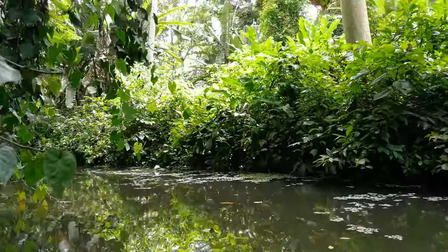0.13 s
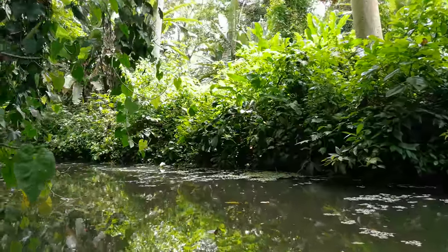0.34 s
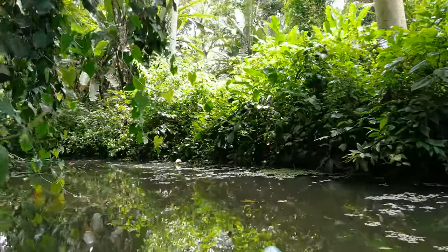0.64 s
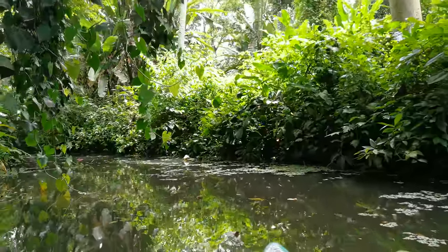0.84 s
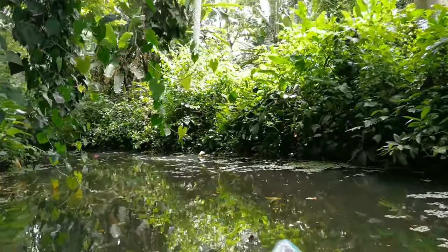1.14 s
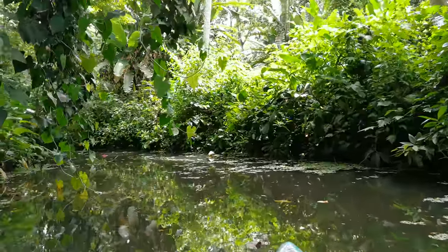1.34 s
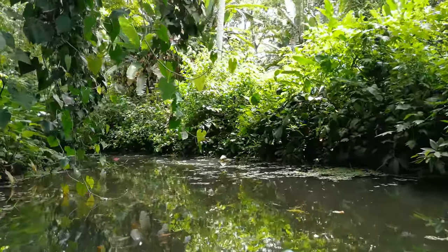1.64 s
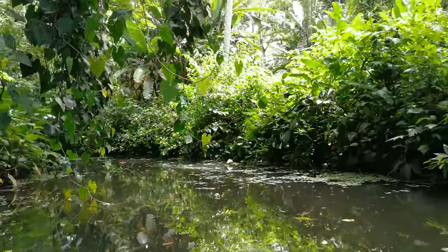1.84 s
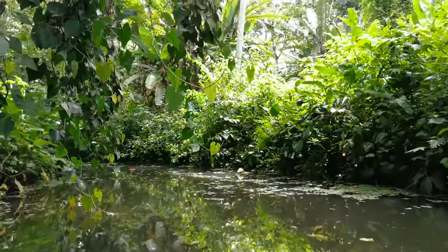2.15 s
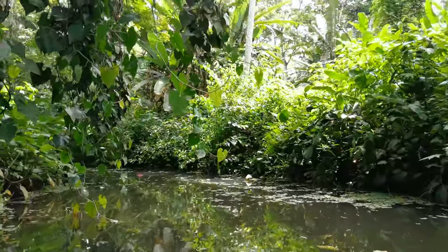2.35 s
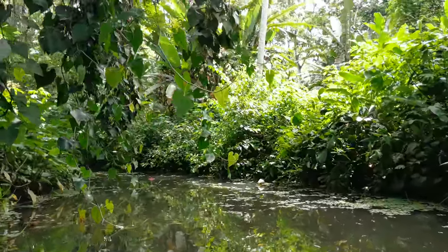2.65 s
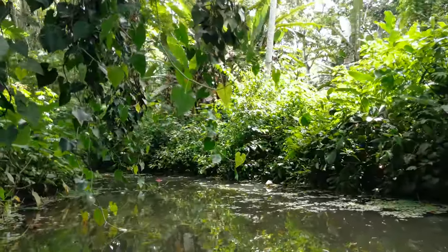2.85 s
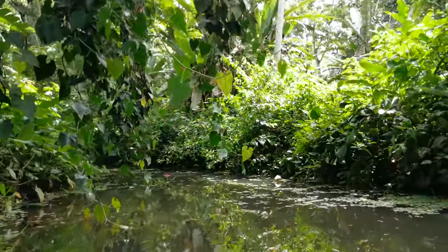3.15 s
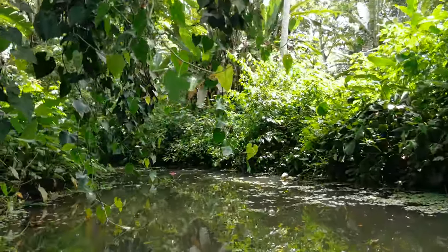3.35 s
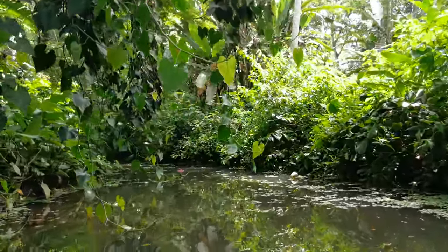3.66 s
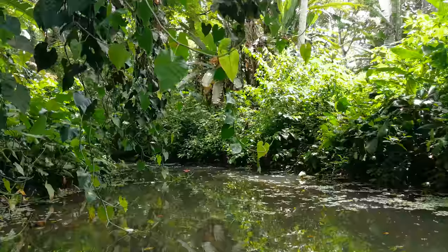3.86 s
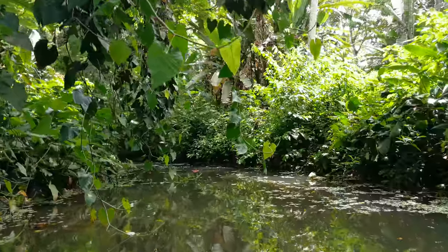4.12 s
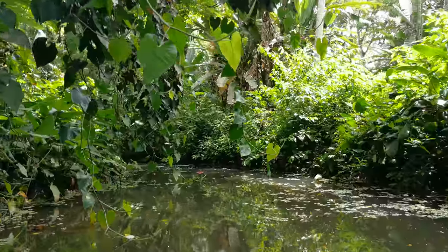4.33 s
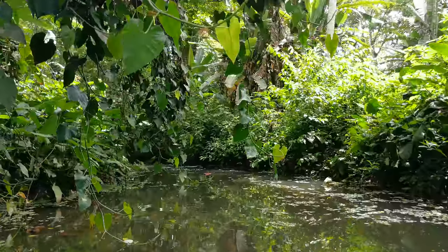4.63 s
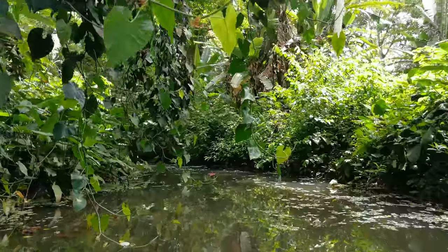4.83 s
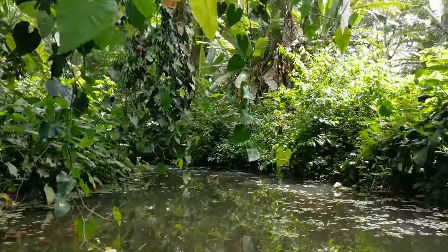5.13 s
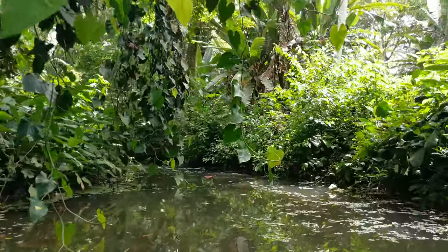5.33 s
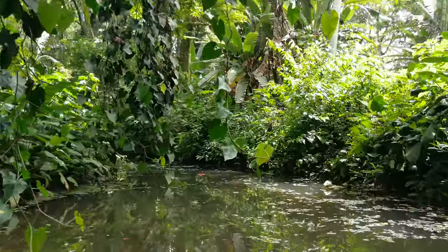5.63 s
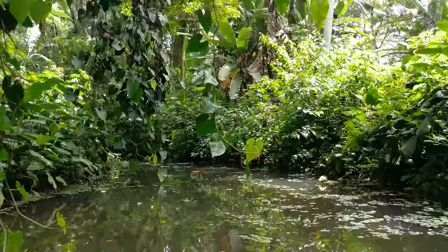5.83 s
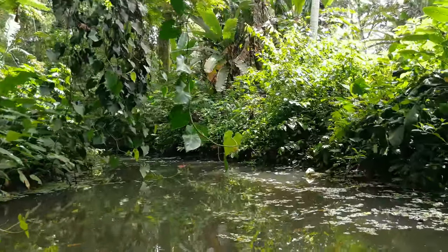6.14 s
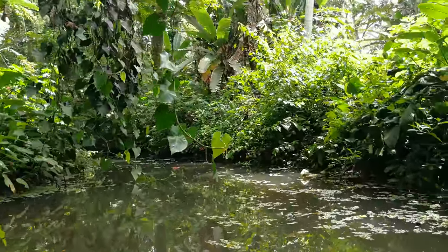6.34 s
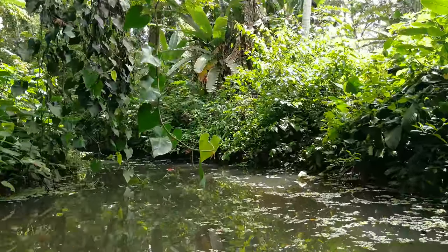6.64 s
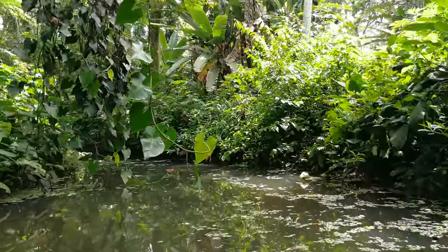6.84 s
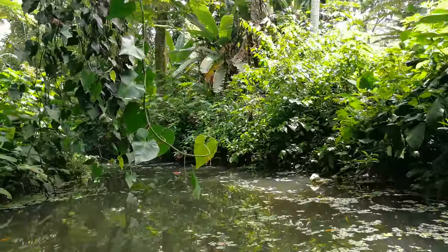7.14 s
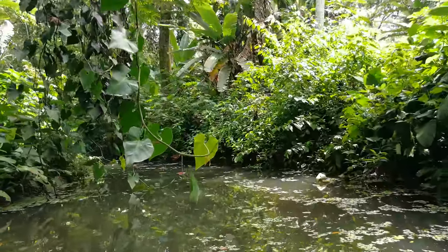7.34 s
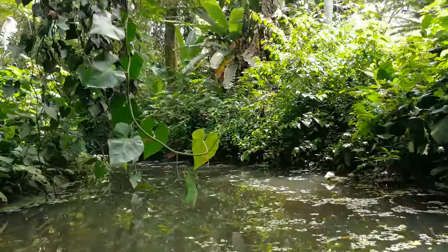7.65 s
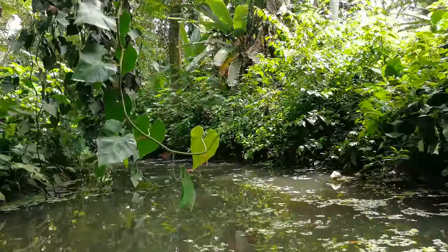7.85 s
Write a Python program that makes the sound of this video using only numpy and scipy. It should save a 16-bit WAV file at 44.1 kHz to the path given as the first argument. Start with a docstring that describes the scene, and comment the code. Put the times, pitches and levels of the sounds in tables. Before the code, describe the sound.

Cicadas shrill steadily from both jungle banks, far louder than the gentle lapping and occasional dull knocks of a drifting wooden boat.

```python
"""Cicadas shrill from both banks of a jungle waterway: a loud high choir over quieter, lower ones,
each insect buckling its ribs so fast, and so many at once, that the clicks fuse into a hiss.
Far softer, water laps and swishes along a drifting wooden boat, with knocks, taps and short scuffs.
A few faint blips pass; underneath lie a low rumble, a wavering hum and the hush of the forest."""
import sys
import numpy as np
from scipy import signal
from scipy.fft import rfft, irfft, next_fast_len
from scipy.io import wavfile
from scipy.ndimage import uniform_filter1d, map_coordinates

SR = 44100
rng = np.random.default_rng(int(sys.argv[2]) if len(sys.argv) > 2 else 0)


def dump_mix(stems):
    """Bounce the given channels to the path in sys.argv[1] as a 16-bit WAV at rate SR."""
    frames = np.atleast_2d(stems).T  # one column per channel
    limited = np.clip(frames, -1, 1)  # hard clip at full scale
    pcm = np.round(limited * 32767).astype(np.int16)
    wavfile.write(sys.argv[1], SR, pcm)


N = 351918

# The high choir swells a little and eases toward the middle: t/s, level/dB, pan/dB (left minus right)
HIGH_CHOIR_RIDE = [(0, -19.5, 2.5), (3.5, -19.5, 2), (7.98, -18.5, 1)]
# Fader ride of the low choir: t/s, level/dB
LOW_CHOIR_RIDE = [(0, -40.5), (0.3, -38), (0.75, -39.5), (1.42, -40.5), (1.75, -37.5), (2.1, -39.5),
                  (2.75, -37), (3.05, -38.5), (4.65, -39.5), (5.6, -38.5), (6.0, -38.5), (6.4, -37.5),
                  (7.98, -38)]
# A few deeper singers strike up and trail off: peak t/s, level/dB, fade/s
FAR_SWELLS = [(3.63, -60, .12), (4.05, -57, 0.16), (4.4, -60, 0.28), (5.13, -59, 0.25), (5.34, -65, 0.079),
              (5.7, -65, .08), (6.02, -59, 0.17), (6.5, -65, 0.24)]
# Air sac resonance of the high singers: f/Hz, gain/dB
HIGH_SAC_EQ = [(3650, -54), (6200, -19.5), (6900, -14.5), (7650, -6), (8400, -2.5), (9000, 0.5),
               (9500, 2.5), (10000, 0), (10300, -1), (10600, -5.5), (11300, -9.5), (12300, -21.5),
               (13100, -28.5), (14200, -47), (15800, -45.5)]
# Air sac resonance of the low singers: f/Hz, gain/dB
LOW_SAC_EQ = [(1940, -83), (3300, -24.5), (3900, -4.5), (4400, 2), (4650, 2.5), (4790, 4.5), (4950, 3),
              (5720, 1), (6800, -1), (8840, -55), (15000, -120)]
# Air sac resonance of the far singers: f/Hz, gain/dB
FAR_SAC_EQ = [(2400, -50), (2800, -9), (3050, 1), (3300, 2), (3650, 5.5), (4100, -2.5), (5000, -120)]
# Stereo tilt that makes the choirs brighter on the left: f/Hz, left minus right/dB
CHOIR_TILT = [(2500, -4.5), (4400, -7), (8100, -4), (15000, 1.5)]
# Wavelets meeting the hull: peak t/s, hiss level/dB, slosh level/dB, fade/s
HULL_WAVELETS = [(0.55, -74, -72, 0.1), (0.85, -75, -81, 0.22), (1.5, -71.5, -76, 0.37),
                 (2.4, -70.5, -84, 0.19), (3.46, -69.5, -76.5, 0.17), (4.65, -66.5, -81, 0.21),
                 (5.05, -76, -74, 0.12), (5.4, -81, -86, 0.18), (6.02, -78, -78, 0.17),
                 (6.55, -75, -86, 0.32), (7.2, -72, -75.5, 0.12), (7.85, -69.5, -74, 0.38)]
# Hiss of water along the hull: f/Hz, gain/dB
LAP_EQ = [(450, -120), (600, -2), (750, -3), (1150, 1), (1800, -0.5), (2300, -2), (2900, -0.5),
          (4000, -120)]
# Water under the boards: f/Hz, gain/dB
SLOSH_EQ = [(150, -120), (210, 0), (270, -1.5), (400, -3.5), (520, -4.5), (700, -31), (1200, -120)]
# Soft blows on the hull: t/s, level/dB, rise/s, struck plank's f/Hz
HULL_KNOCKS = [(1.211, -55.5, .01, 108), (1.262, -56, .01, 170), (1.513, -57.5, .006, 170),
               (1.577, -57, .006, 150), (1.62, -58, 0.0069, 200), (4.959, -58, 0.0093, 250),
               (5.644, -45.5, 0.0032, 292), (5.648, -56, .003, 470), (5.652, -40.5, 0.0048, 127),
               (5.675, -54, 0.0038, 285), (5.701, -50, 0.006, 125), (5.89, -39, 0.0084, 121),
               (5.915, -42.5, 0.0073, 121), (5.898, -53, .003, 630), (5.973, -43.5, 0.005, 190),
               (6.021, -55, 0.011, 105)]
# Ringing modes of the hull: f/Hz, gain/dB, t60/s
HULL_MODES = [(84.4, -15, .3), (108.3, -1.5, 0.32), (125.6, 8, 0.14), (161, 2.5, 0.18), (186.5, 3.5, 0.16),
              (225, 3, 0.17), (283, 3.5, 0.26), (332, -6, 0.11), (465, 4, 0.09), (622, 5.5, 0.1),
              (770, -1, .08), (960, -16, .06)]
# Light taps: t/s, level/dB, slat gain/dB, pan/dB
TAPS = [(0.679, -47, -4, 2), (0.828, -51, -7, 1), (0.955, -49.5, -4, -3), (1.295, -46, -7, 0.5),
        (5.24, -57, -17, -0.5)]
# The short click of a tap: f/Hz, gain/dB, t60/s
CLICK_MODES = [(830, -7.5, .025), (1060, -4, .035), (1250, -7, .025), (1420, -3.5, .03)]
# The ring of a thin slat: f/Hz, gain/dB, t60/s
SLAT_MODES = [(270, -8, 0.12), (422, -8, 0.2), (1106, -13, 0.14)]
# Short scuffs and longer swishes of water: t/s, level/dB, centre f/Hz, width/Hz, length/s, pan/dB
SCUFFS_AND_SWISHES = [(1.401, -61.5, 1450, 550, 0.13, -2), (1.732, -62, 1710, 600, 0.065, 0),
                      (2.28, -66, 1950, 400, 0.05, -2), (3.05, -56, 850, 450, 0.04, -2),
                      (3.066, -52, 1260, 800, 0.063, -4), (3.1, -59.5, 1200, 700, 0.13, -2),
                      (3.13, -56, 1150, 400, 0.014, -3), (3.143, -59, 1700, 700, 0.027, 1),
                      (4.459, -58.5, 1770, 915, 0.13, 1), (6.567, -54, 2520, 400, 0.027, -3),
                      (6.818, -67.5, 560, 150, 0.14, -1), (7.124, -67.5, 1050, 348, .2, 4),
                      (7.179, -63, 1600, 500, .08, 3), (7.757, -63.5, 1520, 1200, 0.21, -5)]
# Pitched blips, one a high falling chirp: t/s, level/dB, start f/Hz, glide/(Hz/s), length/s, pan/dB
BLIP_NOTES = [(2.024, -65, 625, -500, .036, 0), (5.976, -53, 3130, -6500, .065, -4),
              (6.792, -62.5, 600, 900, .032, 6), (6.903, -64, 600, 500, .022, -1)]
# Fader ride of the planks' murmur: t/s, level/dB
MURMUR_RIDE = [(0, -75.5), (0.6, -75), (1.2, -70), (2.2, -75), (2.9, -69), (3.5, -68), (4.2, -72.5),
               (5.0, -68), (6.0, -68), (6.75, -77), (7.98, -76)]
# Low tone of the planks: f/Hz, gain/dB
MURMUR_EQ = [(60, -120), (85, -19), (110, -0.5), (160, -2.5), (220, -8.5), (300, -17), (500, -120)]
# Fader ride of the hum: t/s, level/dB
HUM_RIDE = [(0, -75.5), (2.6, -85), (3.3, -68), (4.25, -70.5), (4.55, -62.5), (4.8, -63), (5.0, -68),
            (5.3, -67), (6.1, -64), (6.3, -76), (6.8, -64), (7.4, -77), (7.65, -66.5), (7.98, -78)]
# Fader ride of the drifting air pressure: t/s, level/dB
PRESSURE_RIDE = [(0.0, -71), (1.13, -70), (1.38, -69), (1.62, -72.5), (4.33, -67), (7.62, -69.5),
                 (7.98, -64)]
# Sub-bass of that drift: f/Hz, gain/dB
PRESSURE_EQ = [(15, -3.5), (30, -5), (70, -2.5), (110, -8.5), (130, -120)]
# Even forest hush: f/Hz, gain/dB
HUSH_EQ = [(300, -120), (500, -23), (900, 10), (1800, -14), (2500, 3), (3000, -10), (3800, -43),
           (5000, -120)]
# Stereo image of the noise beds, narrowest in the bass: f/Hz, left-right correlation
BED_CORRELATION = [(60, 0.43), (150, 1), (380, -0.22), (950, -0.077), (2380, -0.051), (5980, 0.55),
                   (15000, -0.02)]


def choir(sac_eq, count, click_hz, surge_db):
    """Each cicada buckles its ribs at its own rate, from its own direction; air sacs colour the clicks."""
    clicks = np.zeros((2, N + 200))
    for pace, bearing, distance, height in rng.random((count, 4)):
        period = SR / (click_hz * (.8 + .4 * pace))
        gaps = period * (1 + .25 * rng.standard_normal(N // 50))
        at = np.cumsum(np.abs(gaps))
        at = at[at < N].astype(int)
        strength = amp(-6 * distance + surge_db * wobble(14)[at])
        strength *= rng.choice([-1, 1], len(at))  # ribs snap in or out
        lag = round(30 * np.sin(2 * np.pi * bearing) * np.cos(.6 * height))  # samples between the ears
        np.add.at(clicks[0], at + 50 + lag // 2, strength)
        np.add.at(clicks[1], at + 50 + lag // 2 - lag, strength)
    song = filtered(clicks[:, 100:N + 100],
                    lambda hz: panned(amp(along(sac_eq, hz)), along(CHOIR_TILT, hz)))
    return song / song.std(axis=1, keepdims=True)


def near_cicadas():
    """The high choir leads, breathing together a little, over a quieter low choir."""
    high_db, pan_db = curves(HIGH_CHOIR_RIDE)
    sway_db = .22 * (wobble(6) + wobble(20))
    high = amp(high_db + sway_db) * choir(HIGH_SAC_EQ, count=120, click_hz=450.7, surge_db=1.5)
    low = fader(LOW_CHOIR_RIDE) * choir(LOW_SAC_EQ, count=50, click_hz=496.7, surge_db=4)
    return panned(high, pan_db) + low


def far_cicadas():
    """A few deeper singers stutter, swelling out of a faint drone."""
    song = patched(choir(FAR_SAC_EQ, count=16, click_hz=400, surge_db=3), patchy_db=2.5)
    stutter = unit(amp(2.5 * wobble(40)))
    envelope = swells(*np.transpose(FAR_SWELLS), rise_s=.059, base_db=-64.5)
    return panned(song * stutter * envelope, pan_db=-.5)


def water():
    """Wavelets hiss and crackle along the hull and slosh under the boards."""
    peak_s, hiss_db, slosh_db, fade_s = np.transpose(HULL_WAVELETS)
    hiss = swells(peak_s, hiss_db, fade_s, rise_s=.18, base_db=-73)
    slosh = swells(peak_s, slosh_db, fade_s, rise_s=.18, base_db=-81.5)
    ripple, gurgle = amp(1.2 * wobble(45)), amp(2.5 * wobble(16))
    lapping = hiss * ripple * noise_bed(LAP_EQ, patchy_db=2, snaps=.4)
    return lapping + slosh * gurgle * noise_bed(SLOSH_EQ, patchy_db=1.2)


def knocks():
    """Soft blows ring the hull; the modes near the struck plank's own pitch speak most."""
    out, t = np.zeros((2, N)), np.arange(SR // 2) / SR
    for start_s, db, rise_s, plank_hz in HULL_KNOCKS:
        rattle = puff(t, hz=200, width_hz=360)  # loose boards
        ring = .59 * (rattle[0] + .15 * rattle) * decay(t, 0, t60=.12)
        for hz, mode_db, t60 in HULL_MODES:
            share = .18 + np.exp(-(np.log(hz / plank_hz) / .25) ** 2)
            spread = rng.normal(0, (hz / 350) ** 2) * np.c_[[.5, -.5]]  # high modes sound wider
            drift = .023 * np.cumsum(rng.standard_normal(len(t)))  # wet wood does not hold its pitch
            phase = 2 * np.pi * hz * t + drift + rng.uniform(0, 5.3) + spread
            ring += share * decay(t, mode_db, t60) * np.sin(phase)
        out += placed(amp(db) * ring * attack(t, rise_s) ** 2, start_s)
    return out


def taps():
    """Each light tap clicks and leaves a thin slat ringing dully."""
    out, t = np.zeros((2, N)), np.arange(SR // 4) / SR
    for start_s, db, slat_db, pan_db in TAPS:
        click = sum(decay(t, mode_db + rng.normal(0, 1.5), t60) * np.sin(2 * np.pi * hz * t)
                    for hz, mode_db, t60 in CLICK_MODES)
        slat = sum(decay(t, mode_db + rng.normal(0, 1.5), t60) * puff(t, hz, width_hz=70)
                   for hz, mode_db, t60 in SLAT_MODES)
        tap = click * attack(t, .0006) ** 2 + amp(slat_db) * slat * attack(t, .004)
        out += placed(amp(db) * tap, start_s, pan_db)
    return out


def scuffs_and_swishes():
    """Short grainy scuffs and longer swishes of water along the hull."""
    out, t = np.zeros((2, N)), np.arange(SR // 4) / SR
    for start_s, db, hz, width_hz, length_s, pan_db in SCUFFS_AND_SWISHES:
        grain_db = 2.2 * np.repeat(rng.standard_normal(len(t) // 200 + 1), 200)[:len(t)]
        envelope = attack(t, .12 * length_s) * np.exp(-(t / length_s) ** 2)
        out += placed(amp(db + grain_db) * envelope * puff(t, hz, width_hz, snaps=.53), start_s, pan_db)
    return out


def blips():
    """Faint gliding tones, blurred by a wandering phase."""
    out, clock = np.zeros((2, N)), np.arange(SR // 4) / SR
    for start_s, db, hz, glide, length_s, pan_db in BLIP_NOTES:
        t = clock[clock < length_s]
        blur = .07 * np.sqrt(hz / 3000) * np.cumsum(rng.standard_normal((2, len(t))), axis=1)
        tone = np.sin(2 * np.pi * (hz * t + glide * t ** 2 / 2) + blur)
        envelope = np.sin(np.pi * np.sqrt(t / length_s))
        out += placed(amp(db) * envelope * tone, start_s, pan_db)
    return out


def rumble():
    """The planks murmur, a hum wavers near one pitch, and air pressure drifts below."""
    murmur = fader(MURMUR_RIDE) * amp(2.5 * wobble(20)) * noise_bed(MURMUR_EQ, patchy_db=1.2)
    flutter = amp(2.5 * wobble(22))
    hum_hz = 87 + 7 * wobble(18)
    hum = unit(flutter * np.sin(2 * np.pi * np.cumsum(hum_hz) / SR))
    pressure = unit(filtered(rng.standard_normal(N), lambda hz: amp(along(PRESSURE_EQ, hz))))
    return murmur + fader(HUM_RIDE) * hum + fader(PRESSURE_RIDE) * pressure


def forest_hush():
    """A barely audible bed of midrange air."""
    return amp(-81) * noise_bed(HUSH_EQ, patchy_db=2.5)


def noise_bed(eq, patchy_db, snaps=0):
    """Patchy stereo noise with optional crackle; its mid signal has rms 1."""
    def mid_side_gain(hz):
        angle = np.arccos(np.clip(along(BED_CORRELATION, hz), -1, 1)) / 2
        return amp(along(eq, hz)) * [np.cos(angle), np.sin(angle)]
    noise = patched(rng.standard_normal((2, N)) + snaps * crackle(N), patchy_db)
    mid, side = filtered(noise, mid_side_gain)
    return np.array([mid + side, mid - side]) / np.sqrt(np.mean(mid ** 2))


def puff(t, hz, width_hz, snaps=0):
    """A band of stereo noise at rms 1, with optional crackle."""
    noise = rng.standard_normal((2, len(t))) + snaps * crackle(len(t))
    band = np.exp(-((np.fft.rfftfreq(len(t), 1 / SR) - hz) / width_hz) ** 2)
    return unit(irfft(rfft(noise) * band, len(t)))


def crackle(size, per_s=160, spread_db=5):
    """Sparse snaps of uneven strength at rms 1, separate on each side."""
    hits = rng.random((2, size)) < per_s / SR
    strength = amp(spread_db * rng.standard_normal((2, size)))
    return unit(hits * strength * rng.choice([-1, 1], (2, size)))


def patched(x, patchy_db):
    """x with patches of random gain over time and frequency."""
    spectra = signal.stft(x, nperseg=1024)[2]
    patches = uniform_filter1d(rng.standard_normal(spectra.shape[1:]), size=6, axis=0)
    patches = uniform_filter1d(patches, size=5, axis=1)
    return signal.istft(spectra * amp(patchy_db * unit(patches)), nperseg=1024)[1][:, :N]


def swells(peak_s, db, fade_s, rise_s, base_db):
    """Gain over time: a steady base plus swells that rise and fade."""
    t = np.arange(N) / SR - np.c_[peak_s]
    shapes = np.exp(-(t / np.where(t < 0, rise_s, np.c_[fade_s])) ** 2)
    return amp(base_db) + amp(db) @ shapes


def attack(t, rise_s):
    """Gain easing from 0 to 1."""
    return 1 - np.exp(-t / rise_s)


def decay(t, db, t60):
    """Gain that starts at db and loses 60 dB every t60 seconds."""
    return amp(db - 60 * t / t60)


def wobble(rate):
    """A smooth random curve, rate knots a second."""
    knots = rng.standard_normal(int(N * rate / SR) + 4)
    return map_coordinates(knots, [np.arange(N) * rate / SR])


def curves(rows):
    """One value per sample for each column after the time."""
    times, *columns = np.transpose(rows)
    return [np.interp(np.arange(N) / SR, times, column) for column in columns]


def fader(ride):
    """Gain per sample from a level ride."""
    return amp(curves(ride)[0])


def along(points, hz):
    """Reads (frequency, value) points on a log axis."""
    freqs, values = np.transpose(points)
    return np.interp(np.log(hz + 1), np.log(freqs + 1), values)


def filtered(x, response):
    """x through an EQ given as gain against frequency."""
    size = next_fast_len(N + 8192)
    return irfft(rfft(x, size) * response(np.fft.rfftfreq(size, 1 / SR)), size)[..., :N]


def placed(sound, start_s, pan_db=0):
    """A short stereo sound on an otherwise silent track."""
    return np.pad(panned(sound, pan_db), ((0, 0), (round(start_s * SR), N)))[:, :N]


def panned(x, pan_db):
    """Half of the level step goes to each side; positive leans left."""
    return x * amp(np.c_[[.5, -.5]] * pan_db)


def amp(db):
    """Gain of a level in dB."""
    return 10 ** (np.asarray(db) / 20)


def unit(x):
    """x at rms 1."""
    return x / np.sqrt(np.mean(x ** 2) + 1e-20)


def scene():
    """Cicadas up front, water and forest behind, small boat sounds and rumble below."""
    ambience = near_cicadas() + far_cicadas() + water() + forest_hush()
    return ambience + taps() + blips() + scuffs_and_swishes() + knocks() + rumble()


def record(dry):
    """A brick-wall high cut on the mix."""
    return filtered(dry, lambda hz: hz < 15760)


dry = scene()
out = record(dry)
dump_mix(out)
```